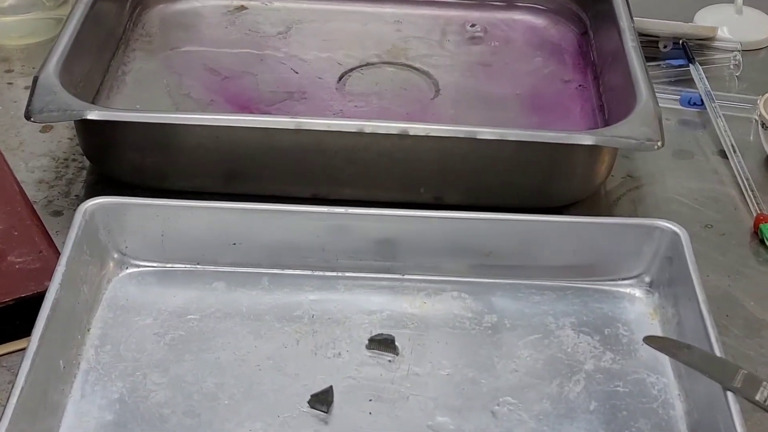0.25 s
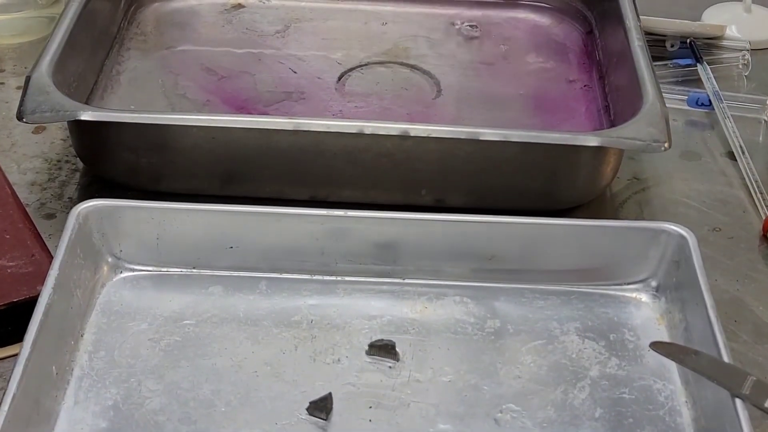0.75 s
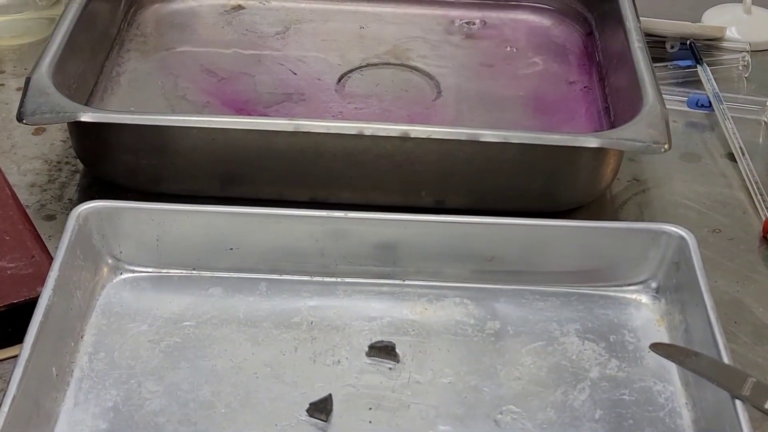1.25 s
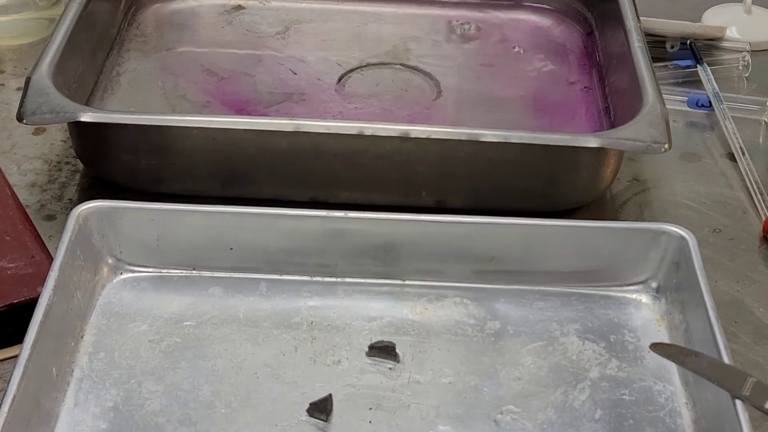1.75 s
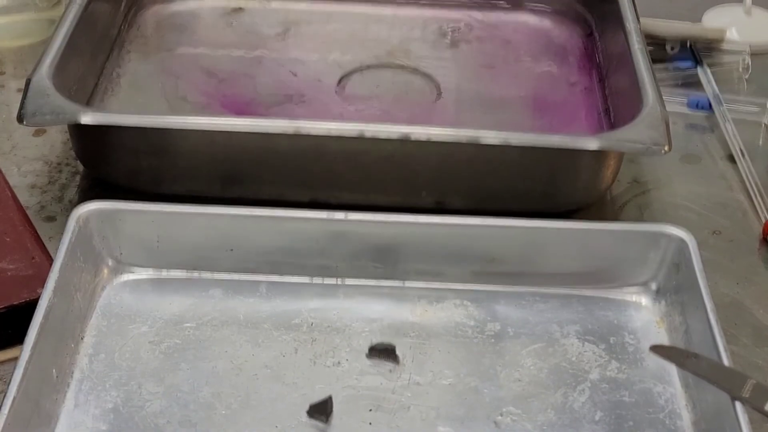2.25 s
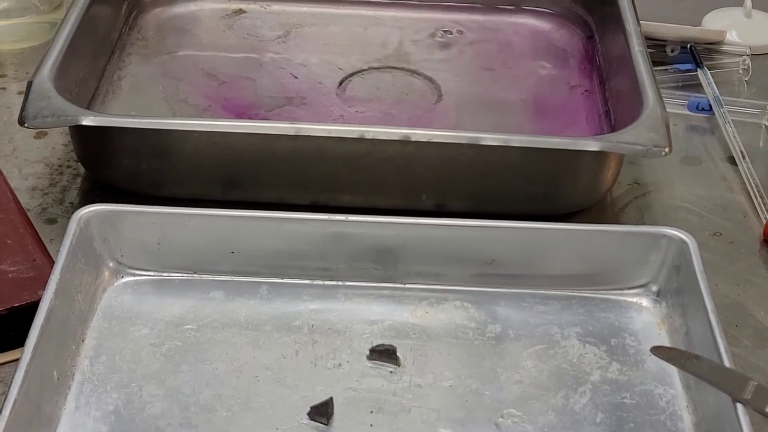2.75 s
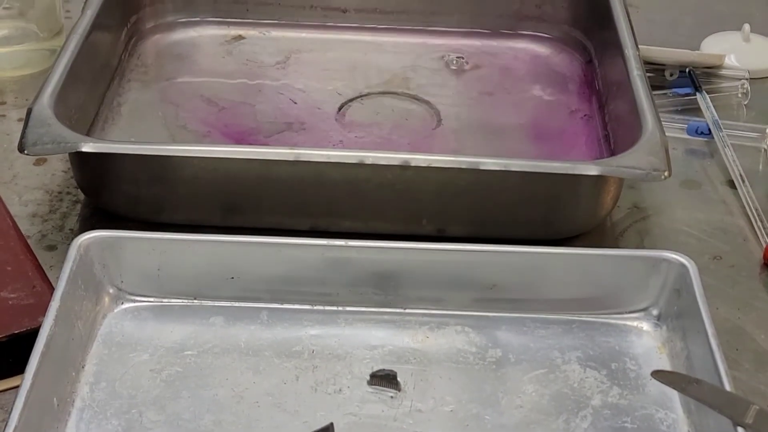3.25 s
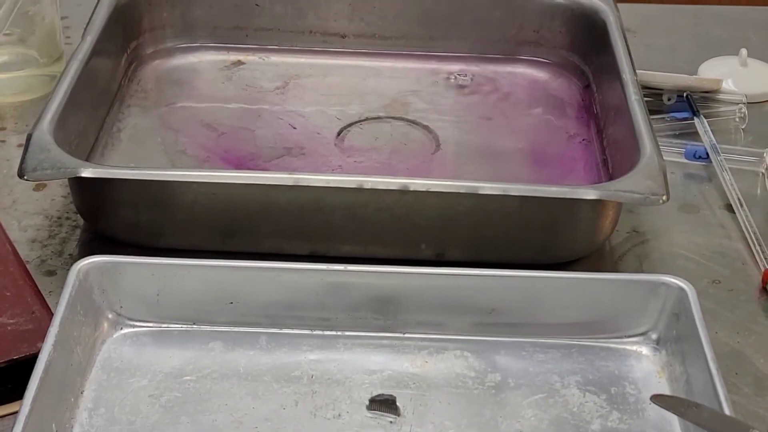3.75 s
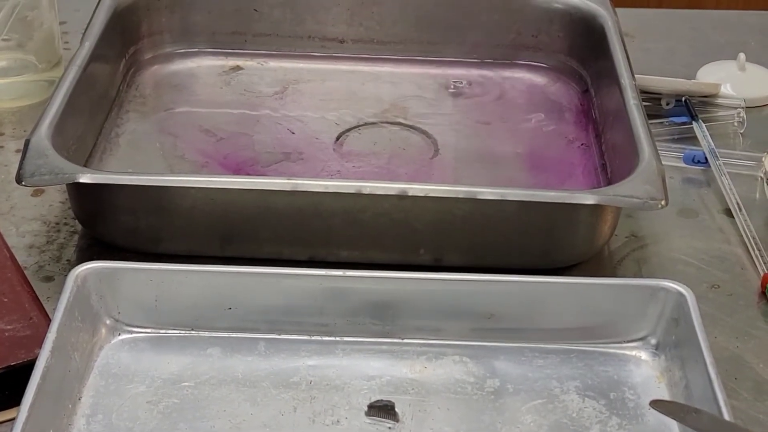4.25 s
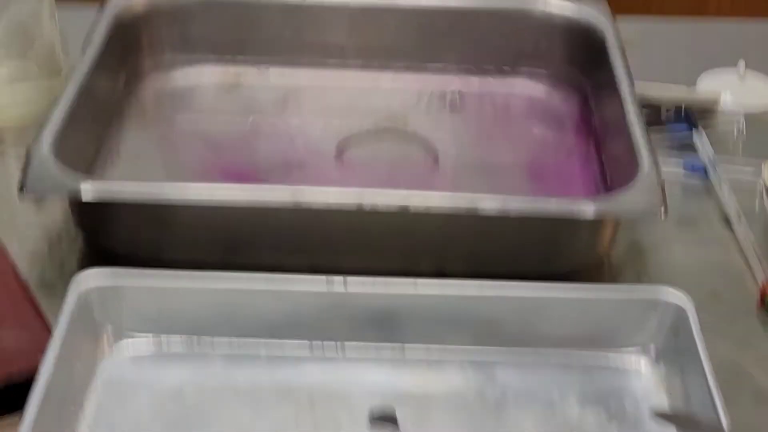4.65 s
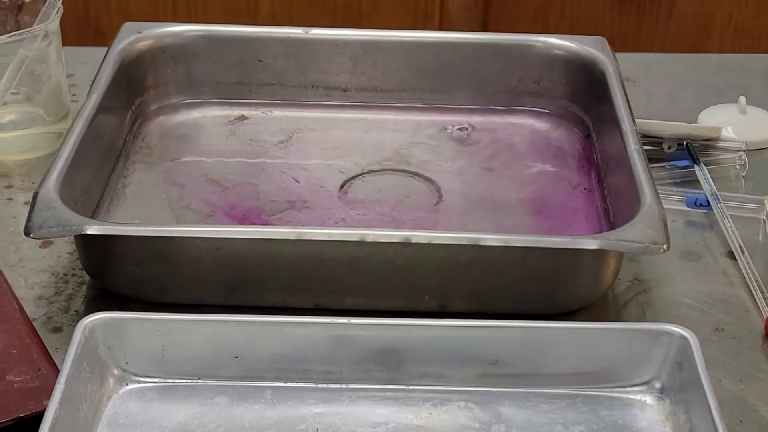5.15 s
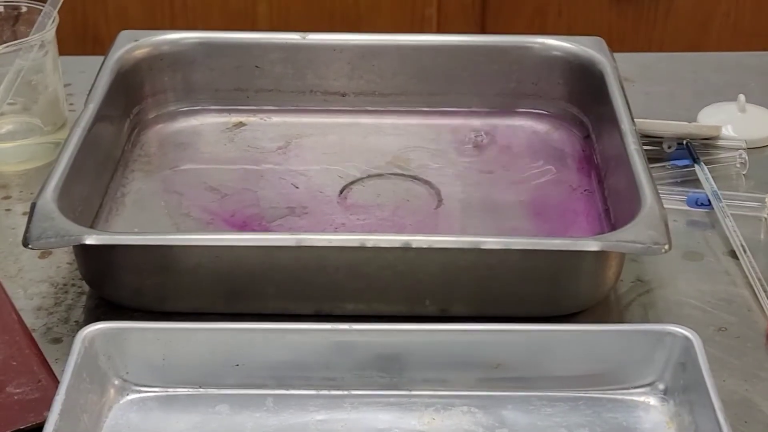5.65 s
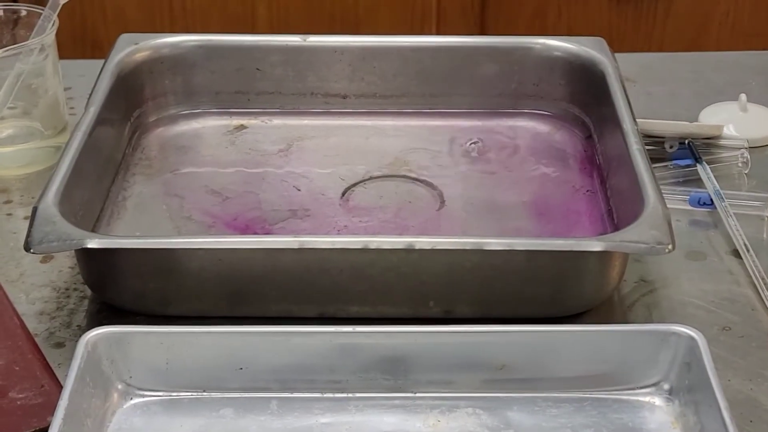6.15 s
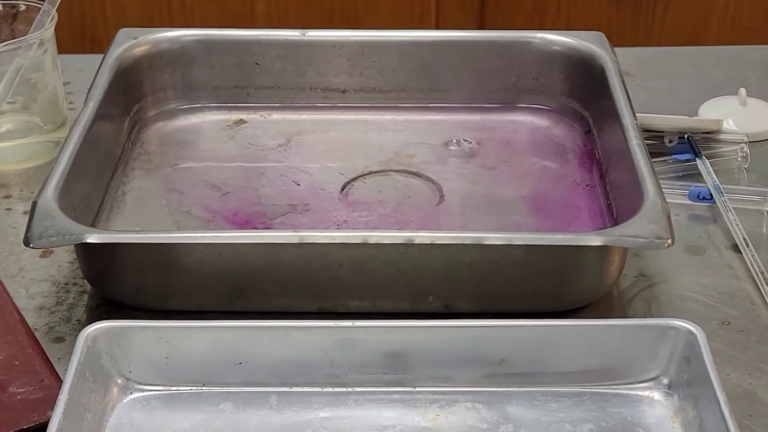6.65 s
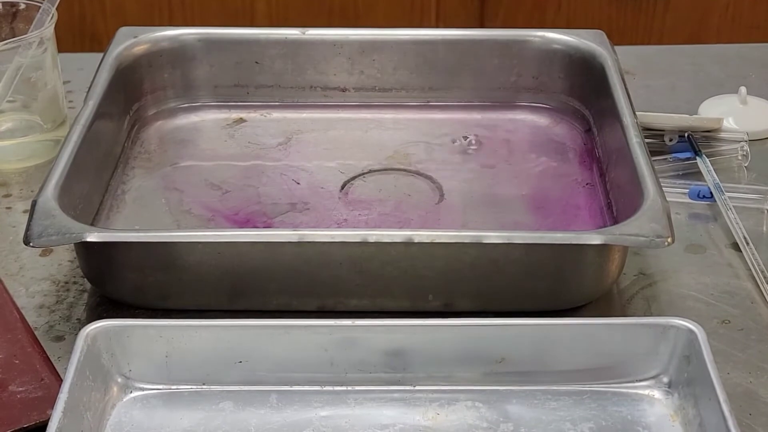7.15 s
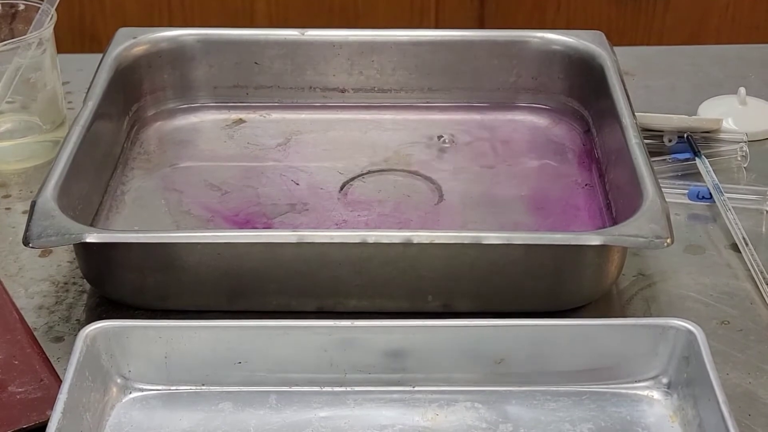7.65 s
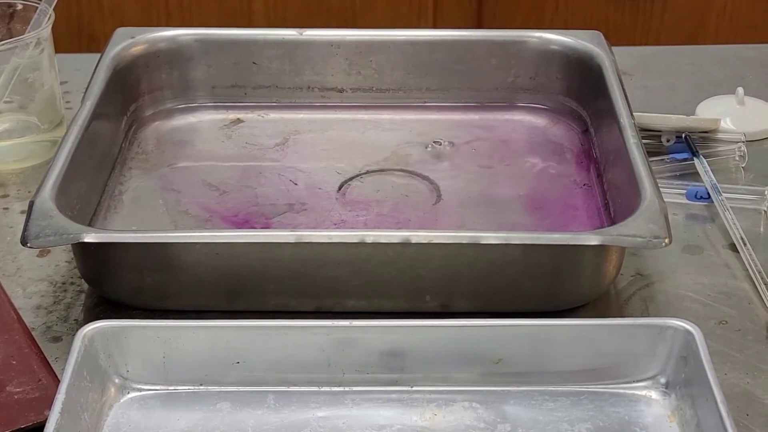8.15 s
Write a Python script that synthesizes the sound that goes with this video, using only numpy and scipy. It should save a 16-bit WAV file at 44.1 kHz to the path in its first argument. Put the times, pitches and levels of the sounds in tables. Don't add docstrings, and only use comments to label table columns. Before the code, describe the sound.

Indoors, low ventilation hum lies under a faint, continuous fizz of metal reacting on water in a steel pan, picked up closely in stereo. A heavy, dull heel thud lands at 0.1 s, followed by softer weight shifts through the floor. Tiny high ticks and pinprick bubble pops pepper the fizz, which drifts a little from side to side. At 1.8 s a knife knocks lightly on a tray; at 2.4 s it rattles briefly and brightly, the clearest metallic event, with a muffled step at 2.7 s. Spits crack from 3 to 4 s, strongest near 3.8 s. The fizz then continues fairly alone until a heavy thud at 5.5 s and more spits through 6.1 s. Another thud comes at 6.7 s, soft gas puffs hiss from 7.1 to 7.6 s, and a heavy step at 7.9 s precedes a dull bench knock at 8.1 s and last small spits.

```python
import sys
import numpy as np
from scipy import signal
from scipy.fft import rfft, irfft, next_fast_len
from scipy.io import wavfile
from scipy.ndimage import uniform_filter1d

SR = 44100
rng = np.random.default_rng(int(sys.argv[2]) if len(sys.argv) > 2 else 0)


def to_wav(s):
    ch = np.atleast_2d(s).T
    pcm = np.round(np.clip(ch, -1, 1) * 32767)
    wavfile.write(sys.argv[1], SR, pcm.astype(np.int16))


def volts_from_db(level):
    exponent = np.asarray(level, float) / 20
    return 10 ** exponent


N = 370881

# (frequency [Hz], level [dB per Hz])
AIR_SPECTRUM = [(90, 2.5), (280, -3.5), (330, -1.5), (390, -8), (460, -4), (550, -15.5), (690, -10),
                (880, -13.5), (1000, -18), (1500, -22.5), (2400, -24), (3500, -27), (8300, -34.5),
                (16000, -30)]
# (frequency [Hz], side minus mid [dB])
AIR_WIDTH = [(60, -2), (110, -18), (200, -16), (380, 0), (700, 2.5), (1290, 3.5), (2380, 1.5), (4400, -71),
             (8120, -29), (15000, -9)]
# (frequency [Hz], left minus right [dB])
AIR_LEAN = [(60, 23), (110, -6), (200, 2), (380, 0), (700, -0.5), (1290, 4.5), (2380, 2), (4400, -6),
            (8120, 7.5), (15000, 6.5)]
# (time [s], level [dB])
AIR_SWELL = [(0.0, -53.5), (1.47, -53.5), (2.6, -52.5), (3.49, -54), (8.29, -53.5), (8.41, -53.5)]
# (time of boom peak [s], boom [dB], then relative to the boom: upper boom [dB],
# deep sway [dB], first arrival [dB])
HEELS = [
    (0.098, -18, -3, -7.5, -12.5),
    (0.75, -48.5, -10, -5, 10),
    (2.44, -40.5, -3.5, -1, -4.5),
    (2.726, -27, -4, -20, -8.5),
    (5.51, -18.5, 1, -3.5, -17.5),
    (6.718, -19, 0, -8.5, -18),
    (7.882, -17.5, -2, -6, -12.5),
]
# (time of peak [s], boom [dB], then relative to the boom:
# upper boom [dB], deep sway [dB], first arrival [dB])
SHIFTS = [(0.46, -34, -17, -6, -15), (0.83, -37.5, 2, 0, -6.5), (1.0, -30, -3, -4.5, -17),
          (1.27, -46.5, 3.5, 9.5, -4), (1.6, -34, 1.5, -2, -13), (1.72, -33.5, -4, 0, -13.5),
          (1.89, -37.5, -5, -3, -5.5), (2.18, -43, -14, -3, -21), (2.8, -33, 4.5, -0.5, -25),
          (3.2, -41.5, 3, 3.5, -6), (3.37, -50, 3.5, -16, -14), (3.89, -43, -6, -1, -10),
          (4.78, -48, -2, -9, -14), (5.12, -57, -8, -11, -1), (5.6, -26, 0, 0, -13),
          (5.88, -39, -10, -2.5, -14), (6.1, -46, -0.5, 6, -4.5), (6.6, -36.5, -6, -1, -21),
          (7.1, -43, -12, 4, -15), (7.45, -37, -1.5, -0.5, -11), (7.62, -48, 2, 3, -18),
          (8.06, -38, -10, 5, -14), (8.26, -44.5, -9, -3, -9)]
HEEL_RISE_DB_PER_S, SHIFT_RISE_DB_PER_S = 197, 139
HEEL_ONSET_S = 0.059
# (fall [dB/s], delay [s], quiet level [dB])
FLOOR_WAVES = [
    (91, -0.0034, -52),
    (130, 0.0025, -55.5),
    (65.6, 0.015, -56),
    (128, -0.025, -65),
]
# (time [s], peak [dB], decay time t60 [s])
BENCH_KNOCKS = [
    (0.7, -50, .2),
    (5.828, -37.5, 0.12),
    (8.056, -35.5, 0.29),
]
# (time [s], blade rattle [dB], lower rattle [dB], tray knock [dB])
KNIFE_STROKES = [(1.831, -72, -41, -39.5), (1.835, -32, -38.5, -50), (1.838, -42, -45, -55),
                 (2.388, -34, -30, -48), (2.403, -27, -31, -31.5), (2.408, -26, -30, -49),
                 (2.414, -23, -33, -44), (2.4207, -17, -29, -32), (2.428, -29, -30, -37),
                 (2.436, -29, -30, -37.5), (2.444, -33, -35.5, -39), (2.457, -31, -37, -42),
                 (2.466, -27.5, -36, -39), (2.471, -30, -39, -47), (2.476, -37, -38, -47),
                 (2.483, -48, -49, -41)]
# (time [s], peak [dB])
TRAY_TOUCHES = [
    (1.827, -42),
    (2.398, -23),
]
# (frequency [Hz], width [Hz], level [dB])
BLADE_MODES = [(2900, 55, -21), (3180, 40, -19), (4590, 46, -32), (5210, 130, -22), (5890, 45, -16.5),
               (6500, 65, -11), (7040, 100, -13), (7600, 40, -17), (8280, 45, -20), (8900, 53, -18),
               (9500, 46, -11), (10300, 40, -10), (11200, 130, -6), (11800, 60, -13), (12900, 70, -7),
               (13090, 45, -8), (14480, 90, -6), (14800, 60, -9), (15190, 55, -2), (15700, 50, -10)]
# (frequency [Hz], width [Hz], level [dB])
TRAY_MODES = [(375, 87, -7), (550, 122, -2), (714, 52, -5)]
STROKE_RISE_DB_PER_S = 9000
BLADE_FALL_DB_PER_S, LOWER_FALL_DB_PER_S, TRAY_FALL_DB_PER_S = 1400, 1900, 1300
TRAY_LEADS_S = .002
# (time [s], peak [dB], ring [Hz],
# decay time t60 [s])
STEEL_PINGS = [(5.574, -46.5, 3191, 0.12), (7.4, -51.5, 2800, 0.097), (8.305, -44, 2840, 0.036),
               (2.3875, -33.5, 2270, 0.03), (3.7715, -35, 1780, .014), (1.8255, -33.5, 559, 0.041),
               (2.6, -26, 81, 0.043), (8.0585, -35, 520, .014), (8.0645, -42, 1330, .015),
               (8.0645, -39, 820, .02), (1.831, -35, 280, 0.029), (2.44, -41, 720, 0.092)]
PORT_LAG = 1
# (time [s], delay of the left port [samples])
BEARING = [(0.0, -9), (2.3, -9), (2.9, 18), (6.3, 18), (6.6, -14), (8.41, -14)]
# (time [s], peak [dB], pitch [Hz], left minus right [dB])
TICKS = [(0.41, -48, 6900, -8), (0.656, -50, 7010, -13), (0.895, -42.5, 7100, -4), (0.976, -46, 5200, 0.5),
         (1.2475, -58, 6380, -0.5), (2.9292, -51, 8500, 12), (2.937, -54, 6820, 8), (3.2954, -49, 5600, 13),
         (3.701, -51, 6760, 9), (3.9846, -52, 5800, 10), (3.9947, -49, 6000, 14), (4.1057, -46, 5800, 3),
         (6.1594, -52, 7580, 0), (6.458, -50, 8700, 10), (6.904, -47, 7050, -4), (7.055, -47, 7500, 0.0),
         (7.711, -43, 6500, -9)]
# (time [s], peak [dB], pitch [Hz], left minus right [dB])
SPECKS = [(0.054, -48, 12500, 3), (0.3411, -42, 7520, 2.0), (0.7243, -44, 8800, 4.0),
          (0.7677, -46, 12000, 4.0), (0.827, -39, 9000, 1), (1.255, -48, 11500, 3),
          (1.3788, -49, 12500, 2.0), (1.5174, -40, 7400, -1.0), (1.703, -43, 11500, 2.0),
          (1.7774, -43, 7500, 8), (2.1116, -47, 8970, 4.5), (2.1874, -47, 11400, 3.0),
          (2.502, -48, 9600, 0), (2.6748, -43, 15000, 4.5), (2.697, -45, 8000, 6),
          (2.8479, -48, 14500, 3.5), (3.3947, -45, 9000, 3.0), (3.4715, -45, 7540, 3.5),
          (3.8581, -48, 11400, 3.0), (3.968, -49, 10000, 4), (4.2582, -42, 12000, 1.0),
          (4.3201, -49, 10700, 5.0), (4.4124, -47, 8000, 5.5), (4.4712, -43, 10200, 4.5),
          (4.4982, -45, 14000, 3.0), (4.6329, -40, 10800, 4.0), (4.7731, -48, 9410, 5.0),
          (4.813, -41, 6200, 7), (4.9661, -45, 10100, 4.0), (4.972, -45, 7500, 4),
          (5.9259, -49, 11400, 1.5), (6.315, -44, 11200, 5.5), (6.766, -45, 8640, 1.5),
          (7.149, -46, 6500, 1), (7.609, -45, 8000, 1), (8.3574, -47, 9360, 3.0)]
# (time [s], peak [dB], pitch [Hz], low part [dB], top part [dB])
SPITS = [(2.9653, -41, 3960, 12, -8), (3.2475, -37.5, 3880, -8, 3), (3.3279, -34, 1600, 8, -16),
         (3.4435, -30.5, 2720, 5, -2.5), (3.7709, -24.5, 1530, 7, 0.5), (3.8876, -32, 2650, 5.5, 5),
         (4.0048, -36.5, 3000, 7, -3), (4.0295, -35.5, 2600, 10, 9), (5.5718, -29, 3020, -30, -14),
         (5.828, -29.5, 2200, 3, -16), (5.863, -30, 2430, -19, -4), (6.09, -27.5, 1300, 6, -27),
         (8.0581, -40.5, 1680, 19.5, -25), (8.2242, -33, 3230, -4, -27), (8.304, -44, 2780, -23, -18.5)]
SPIT_PAN_DB = 13.5
SNAP_LATE_S = .0014
# (time [s], strength [dB], centre of bubble pitches [Hz], share of fine bubbles [dB],
# bright band of the spray [Hz])
FIZZ = [(0.0, -56, 4070, 3.5, 8400), (0.3, -54, 4160, 5, 9100), (0.6, -56.5, 3980, 3, 8700),
        (0.95, -56, 4050, 1, 8900), (1.4, -55.5, 4140, -0.5, 9100), (1.9, -55.5, 4080, -0.5, 9000),
        (2.2, -51, 4440, 0, 9100), (2.55, -55, 4400, -3, 10600), (3.0, -55, 4360, -2, 11000),
        (3.7, -52, 4730, -2.3, 10900), (4.9, -53.5, 4700, -3, 10600), (5.75, -51.5, 4840, -0.5, 11000),
        (6.22, -52, 4550, -3, 11200), (6.6, -55.5, 3500, -1, 12600), (7.0, -55.5, 3520, -3, 12400),
        (7.25, -53, 4020, -2, 12000), (7.53, -54.5, 3290, -3.5, 12400), (8.41, -58.5, 3470, -2, 13000)]
# (frequency [Hz], width [Hz], level [dB])
PAN_MODES = [(2750, 330, -8.5), (3100, 185, 0), (3520, 620, -3), (3863, 180, -0.5), (4104, 280, -2.5),
             (4364, 150, -6), (4580, 190, 0), (4960, 520, -7.5), (5315, 210, -5.5)]
# (frequency [Hz], width [Hz], level [dB])
SMALL_MODES = [(5800, 150, -1), (6180, 780, 1.5), (6910, 460, 2), (7480, 260, -2.5)]
# (frequency [Hz], width [Hz], level [dB])
SMALLER_MODES = [(8100, 300, 6), (8650, 300, 7.5), (9100, 230, 9), (9480, 240, 2.5)]
# (frequency [Hz], width [Hz], level [dB])
SPRAY_MODES = [(10000, 240, -0.5), (11070, 780, 1.5), (11900, 700, -6.5), (13100, 1000, -0.5),
               (14300, 970, -5), (15700, 1200, -6)]
# (mean level [dB], how far each follows the share of fine bubbles [dB/dB])
FINE_FAMILIES = [
    (-61, 0.67),
    (-68.5, 1.35),
    (-63, 1.03),
]
RIDGE_DB, RIDGE_OCTAVES = 7.0, .15
# (time [s], length [s], level [dB], low edge [Hz], high edge [Hz])
GAS_PUFFS = [
    (0.717, 0.052, -52, 1500, 9300),
    (7.126, 0.065, -54.5, 5500, 8000),
    (7.247, 0.034, -50, 4000, 9300),
    (7.384, 0.046, -56, 5800, 7600),
    (7.436, 0.058, -48, 1780, 10900),
    (7.525, 0.075, -48, 2460, 3700),
    (7.529, .06, -64, 4800, 6750),
    (7.638, 0.036, -59, 8000, 11000),
]


def rms_one(x):
    return x / np.sqrt(np.mean(x ** 2) + 1e-20)


def in_time(rows):
    s, *columns = np.transpose(rows)
    return [np.interp(np.arange(N) / SR, s, c) for c in columns]


def at_hz(points, hz):
    point_hz, db = np.transpose(points)
    return np.interp(np.log(hz), np.log(point_hz), db)


def drift(rate):
    r = np.exp(-80 * np.pi * rate / SR)
    slow = signal.lfilter([1], [1, -2 * r, r * r], rng.standard_normal(N // 40 + 2002))[2000:]
    return np.interp(np.arange(N) / 40, np.arange(len(slow)), rms_one(slow - slow.mean()))


def fading(size, t60):
    return -60 * np.arange(size) / SR / t60


def resonance(x, hz, width):
    r = np.exp(-np.pi * width / SR)
    poles = [1, -2 * r * np.cos(2 * np.pi * hz / SR), r * r]
    return signal.lfilter(np.array([1, 0, -1]) * (1 - r * r) / 2, poles, x + 1e-18)


def band(x, low_hz, high_hz, order=2):
    sos = signal.butter(order, [low_hz, min(high_hz, SR / 2.2)], "band", fs=SR, output="sos")
    return signal.sosfilt(sos, x + 1e-18)


def placed(x, pan_db, lag):
    return np.array([np.roll(x, lag) * volts_from_db(pan_db / 2), x * volts_from_db(-pan_db / 2)])


def lag_at(s):
    return np.round(np.interp(s, *np.transpose(BEARING))).astype(int)


def grains(per_s, spread_db):
    sizes = volts_from_db(spread_db * np.minimum(rng.exponential(1, N), 5)) * rng.choice([-1, 1], N)
    return sizes * (rng.random(N) < per_s / SR)


def swells(s, times, peak_db, rise, fall, onset=np.inf):
    since = s - np.asarray(times)[:, None]
    gain = volts_from_db(np.asarray(peak_db)[:, None] + np.where(since < 0, rise * since, -fall * since))
    opening = np.clip((since + onset) / .012, 0, 1)
    return np.sqrt(np.sum((gain * opening) ** 2, axis=0))


def air():
    size = next_fast_len(N)
    hz = np.maximum(np.arange(size // 2 + 1) * SR / size, 1)
    colour = volts_from_db(at_hz(AIR_SPECTRUM, hz)) / (1 + (66.6 / hz) ** 4)
    mid, side = rfft(rng.standard_normal((2, size))) * colour
    side = side * volts_from_db(at_hz(AIR_WIDTH, hz))
    lean = volts_from_db(at_hz(AIR_LEAN, hz) * np.array([[.5], [-.5]]))
    out = irfft(lean * np.array([mid + side, mid - side]), size)[:, :N]
    level_db = in_time(AIR_SWELL)[0] + 4.5 + 0.8 * drift(3.8)
    return volts_from_db(level_db) * out / np.std(out.mean(axis=0))


def evened(x, size):
    return rms_one(x / (np.sqrt(uniform_filter1d(x ** 2, size=size)) + 0.046 * x.std()))


def floor_sway(layer):
    fall, late, quiet_db = FLOOR_WAVES[layer]
    s = np.arange(0, N, 64) / SR
    power = volts_from_db(quiet_db) ** 2
    heel_onset = HEEL_ONSET_S + min(late, .005)
    for table, rise, onset in ((HEELS, HEEL_RISE_DB_PER_S, heel_onset), (SHIFTS, SHIFT_RISE_DB_PER_S, np.inf)):
        rows = np.array(table)
        peak_db = rows[:, 1] + (layer > 0) * rows[:, 1 + layer]
        power = power + swells(s, rows[:, 0] + late, peak_db, rise, fall, onset) ** 2
    return np.interp(np.arange(N) / SR, s, np.sqrt(power))


def footfalls():
    boom, upper, sway, first = [floor_sway(layer) for layer in range(4)]
    white = rng.standard_normal((6, N))
    mid = boom * evened(band(white[0], 47.3, 67.8), size=1500)
    mid += upper * evened(band(white[5], 66.8, 87.6, order=3), size=1500)
    mid += sway * evened(band(white[1], 23.1, 44.7), size=2500)
    mid += first * evened(band(white[2], 84.0, 180.0, order=3), size=1200)
    side = boom * volts_from_db(-13.0) * rms_one(band(white[3], 29, 87, order=3))
    side += first * volts_from_db(-13.0) * rms_one(band(white[4], 73, 210))
    return np.array([mid + side, mid - side])


def bench_knocks():
    out, size = np.zeros((2, N)), 6000
    for s, db, t60 in BENCH_KNOCKS:
        puff = rng.standard_normal((2, size)) * volts_from_db(db + 3.0 + fading(size, t60))
        i = round(s * SR)
        out[:, i:i + size] += band(puff + 0.22 * puff[::-1], 220, 1540)
    return out


def knife():
    times, high_db, low_db, knock_db = np.transpose(KNIFE_STROKES)
    at = slice(round((times[0] - .02) * SR), round((times[-1] + .1) * SR))
    s = np.arange(N)[at] / SR
    blade = swells(s, times, high_db, STROKE_RISE_DB_PER_S, BLADE_FALL_DB_PER_S)
    lower = swells(s, times, low_db, STROKE_RISE_DB_PER_S, LOWER_FALL_DB_PER_S)
    knock = swells(s, times - TRAY_LEADS_S, knock_db, STROKE_RISE_DB_PER_S, TRAY_FALL_DB_PER_S)
    shared, taps, out = grains(15000, spread_db=3.0)[at], np.zeros(N), np.zeros((2, N))
    edges = np.isin(np.arange(N)[at], np.round(times * SR))
    for when, db in TRAY_TOUCHES:
        taps[round(when * SR)] = volts_from_db(db)
    for side in range(2):
        chatter = rms_one(shared + .9 * rng.permutation(shared)) + 5.7 * edges
        high = blade * 0.5 * (-1) ** side * rms_one(band(chatter[::-1], 10800, 13800))
        low = lower * 0.48 * rms_one(band(chatter[::-1], 1340, 8400))
        for k, (hz, width, db) in enumerate(BLADE_MODES):
            strength = volts_from_db(db + rng.normal(0, 1) - 3.5) * (-1) ** (side * k) * np.sqrt(SR / width / 9)
            drive = chatter * (blade if hz > 8000 else lower)
            ring = strength * resonance(drive, hz, width * 1.04)
            if hz > 8000:
                high = high + ring
            else:
                low = low + volts_from_db(11.5) * ring
        tray = 0
        for k, (hz, width, db) in enumerate(TRAY_MODES):
            tray = tray + volts_from_db(db) * (-1) ** (side * k) * resonance(chatter, hz, width)
        out[side, at] = high + low + knock * volts_from_db(6.0) * rms_one(tray)
        firm = resonance(resonance(taps, 540.0, 220.0), 560.0, 370.0)
        out[side] += volts_from_db(38.0) * (.4, 1)[side] * firm
    return out * volts_from_db([[-2.5], [2.5]])


def steel_pings():
    out, size = np.zeros((2, N)), 4000
    for s, db, hz, t60 in STEEL_PINGS:
        fade = volts_from_db(db + fading(size, t60))
        splash = band(rng.standard_normal(size) * fade ** 2 / volts_from_db(db), hz, hz * 2.2)
        ring = fade * np.sin(2 * np.pi * hz * np.arange(size) / SR)
        i = round(s * SR)
        out[:, i:i + size] += placed(ring + 1.6 * splash, 11.0 * (hz > 300), PORT_LAG)
    return out


def ticks():
    faint = grains(45, spread_db=3.0) * volts_from_db(-49.0)
    out = placed(band(faint, 5000, 16000, order=1), 1.8, PORT_LAG)
    size = 512
    for s, db, hz, pan_db in TICKS:
        puff = rng.standard_normal(size) * volts_from_db(fading(size, 0.006))
        sound = 0.43 * band(puff, hz / 1.6, hz * 1.9) + 3.8 * resonance(puff, hz, hz / 11.3)
        i = round(s * SR)
        out[:, i:i + size] += placed(sound * volts_from_db(db + 10.0), pan_db, lag_at(s))
    return out


def specks():
    out, size = np.zeros((2, N)), 512
    for s, db, hz, pan_db in SPECKS:
        around = volts_from_db(-60 * np.abs(np.arange(size) - 40) / SR / .005)
        edge = np.eye(1, size, 40)[0] + .3 * rng.standard_normal(size) * around
        sound = band(edge, hz / 1.15, hz * 1.15)
        i = round(s * SR)
        out[:, i:i + size] += placed(sound / np.abs(sound).max() * volts_from_db(db + 3.0), pan_db, lag_at(s))
    return out


def spits():
    out, size = np.zeros((2, N)), 2048
    for s, db, hz, low_db, top_db in SPITS:
        puff = rng.standard_normal((2, size)) * volts_from_db(fading(size, 0.011))
        puff[1] = 0.17 * puff[0] + 1.7 * puff[1]
        tail = rng.standard_normal((2, size)) * volts_from_db(fading(size, 0.029) - 24.5)
        crack = 1.15 * band(puff, hz, hz * 1.78) + 2.3 * resonance(puff + .3 * tail, hz, hz / 16.0)
        low = volts_from_db(low_db - 1.0) * band(puff + 10.8 * tail, 220, 1240)
        snap = np.eye(1, size) * 3.3 + 0.1 * puff
        top = volts_from_db(top_db + 3.5) * band(snap, 3200, 8700, order=1)
        i = round((s + SNAP_LATE_S) * SR)
        sound = (crack + low + top) * volts_from_db(db - 5.5 + SPIT_PAN_DB * np.array([[.5], [-.5]]))
        out[:, i:i + size] += sound[:, :N - i]
    return out


def modes(x, table, flicker_db, weight=lambda hz: 1):
    out = 0
    for k, (hz, width, db) in enumerate(table):
        own = np.roll(x, 30011 * k, axis=-1)
        ring = resonance(resonance(own, hz, 1.5 * width), hz, 1.5 * width)
        out = out + volts_from_db(db + flicker_db * drift(14.0)) * weight(hz) * ring
    return out


def fizz():
    level_db, centre_hz, fine_db, ridge_hz = in_time(FIZZ)
    small_db, smaller_db, spray_db = [db + follows * fine_db for db, follows in FINE_FAMILIES]
    surge = .9 * drift(8.0) + .9 * drift(22.0)

    def near(hz):
        cancelled_db = 15.0 * np.exp(-(np.log2(hz / (.77 * centre_hz)) / .12) ** 2)
        octaves = np.abs(np.log2(hz / centre_hz))
        return volts_from_db(-10.0 * np.minimum(octaves / 0.88, 1.2) ** 1.6 - cancelled_db)

    def lifted(hz):
        return volts_from_db(RIDGE_DB * np.exp(-(np.log2(hz / ridge_hz) / RIDGE_OCTAVES) ** 2))

    straight = grains(8000, spread_db=4.5)
    lone = np.array([grains(8000, spread_db=6.5), grains(8000, spread_db=6.5)])
    pops = placed(straight, 1.0, 0) + .45 * lone
    out = volts_from_db(level_db + surge) * rms_one(modes(pops, PAN_MODES, 3.36, near))
    out += volts_from_db(small_db + .9 * surge) * rms_one(modes(pops, SMALL_MODES, 2.6))
    out += volts_from_db(smaller_db + .8 * surge) * rms_one(modes(pops, SMALLER_MODES, 2.6, lifted))
    out += volts_from_db(spray_db + 1.6 * surge) * rms_one(modes(pops, SPRAY_MODES, 2.0, lifted))
    for s, length, db, low_hz, high_hz in GAS_PUFFS:
        at = slice(round((s - .2) * SR), round((s + .2) * SR))
        swell = np.exp(-.5 * ((np.arange(N)[at] / SR - s) / (0.4 * length)) ** 2)
        gas = rms_one(pops[:, at]) + rng.standard_normal((2, len(swell)))
        out[:, at] += volts_from_db(db) * swell * rms_one(band(gas, low_hz, high_hz, order=1))
    late = np.arange(N) - lag_at(np.arange(N) / SR)
    out[0] = out[0, late % N]
    return out


def scene():
    room = air() + footfalls() + bench_knocks()
    steel = knife() + steel_pings()
    return room + steel + ticks() + specks() + spits() + fizz()


def roll_off(x):
    return signal.sosfilt(signal.butter(12, 16660, fs=SR, output="sos"), x)


def record(dry):
    cut = signal.ellip(10, .3, 60, 15700, fs=SR, output="sos")
    return roll_off(signal.sosfilt(cut, dry))


dry = scene()
out = record(dry)
to_wav(out)
```